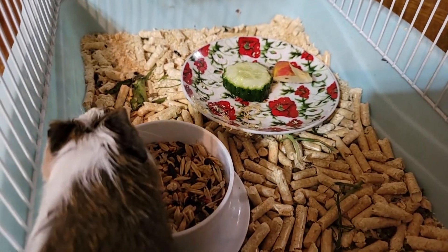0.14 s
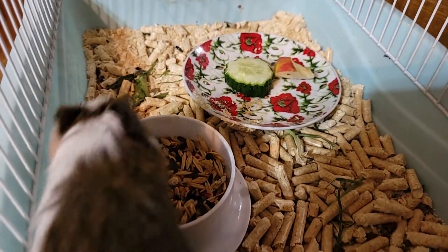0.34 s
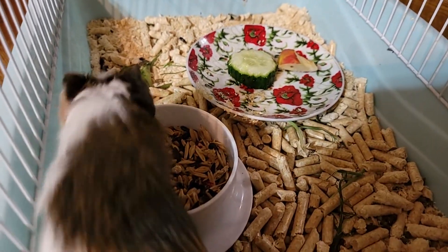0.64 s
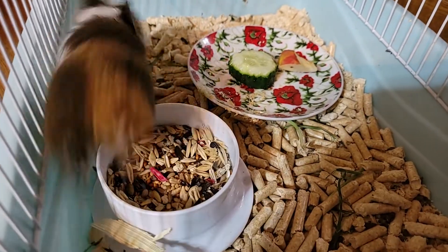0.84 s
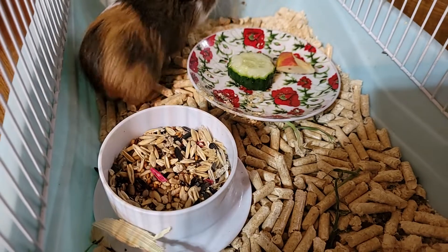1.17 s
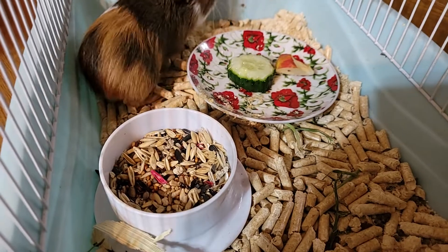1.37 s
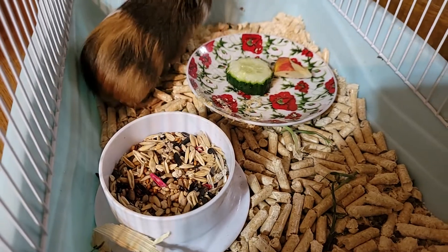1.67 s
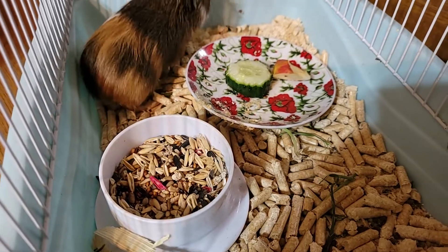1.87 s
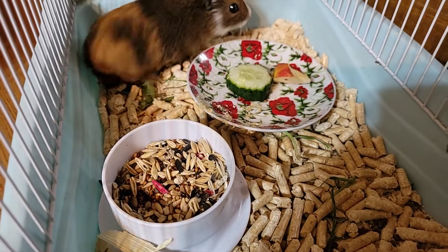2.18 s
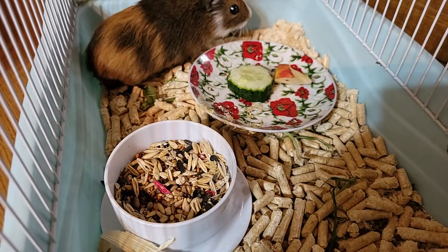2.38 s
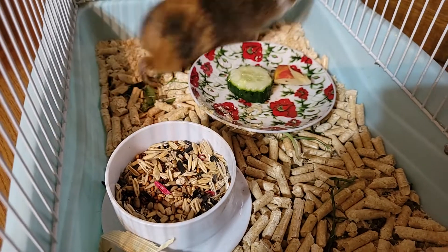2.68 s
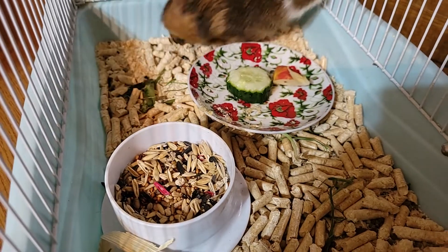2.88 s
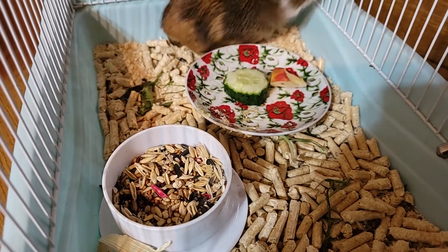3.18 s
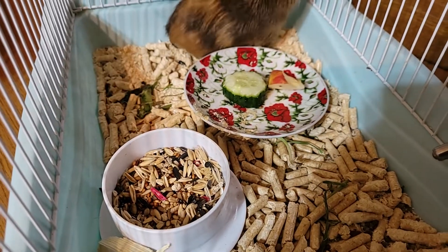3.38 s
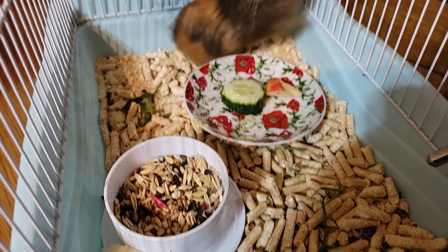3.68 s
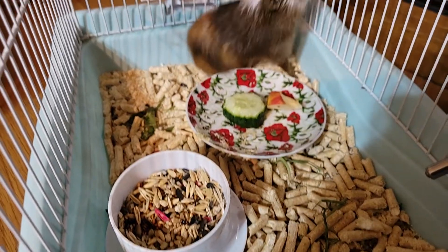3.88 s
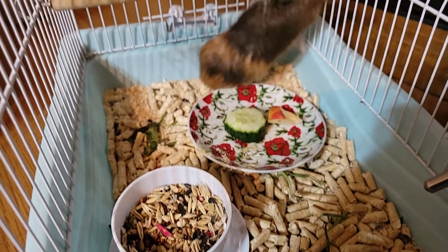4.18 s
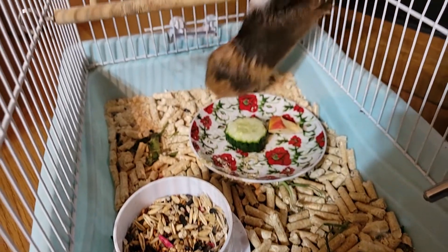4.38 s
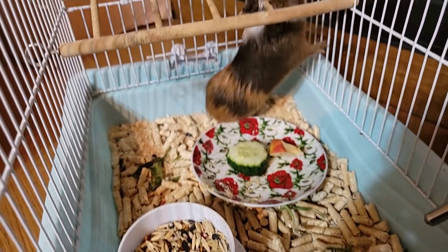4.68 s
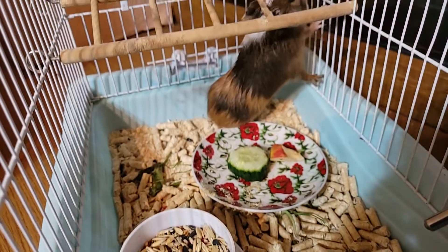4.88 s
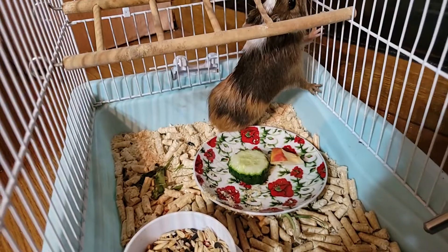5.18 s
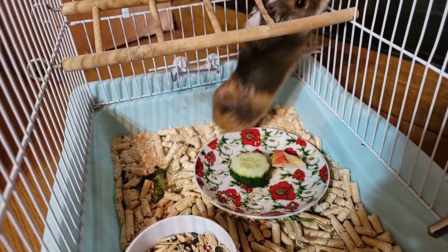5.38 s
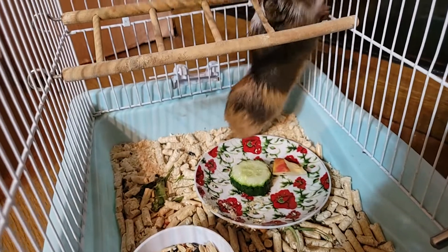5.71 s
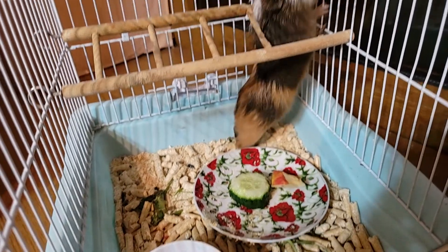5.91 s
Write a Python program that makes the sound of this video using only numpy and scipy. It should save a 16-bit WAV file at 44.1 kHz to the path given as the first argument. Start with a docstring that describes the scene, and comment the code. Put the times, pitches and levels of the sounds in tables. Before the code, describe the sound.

A close stereo microphone hears a guinea pig in a wire cage, in a quiet room with faint hiss and a low wavering hum. At 0.5 s comes a tiny rough cluck and a pellet rustle. At about 0.8 and 0.9 s two sharp, hollow plastic clacks against the food bowl dominate, each with a brief noisy room tail, amid rustling bedding, dry ticks and soft low footfalls until 1.5 s. Short, nearly pure squeaks, each flicking upward, come at 1.0, 1.2, 1.5, 2.1, 2.6, 2.8 and 3.0 s, then fainter and more roomy at 3.3, 3.9, 4.5, 4.9 and 5.5 s. A light knock falls at 2.7 s. Around 4.0 s paws knock in a quick cluster with a thump, rustle and faint wire ping; duller knocks and very faint bar scrapes follow until 4.6 s. A last soft knock comes at 5.5 s and a faint step at 5.7 s.

```python
"""A guinea pig clucks short squeaks, nearly pure tones that flick upward, in a wire cage in a quiet room. As it
hops past the food bowl, two sharp clacks ring plastic modes and each shakes the seeds in the bowl, which rattle
as diffuse noise. Low floor modes thump under its feet and filtered noise rustles as pellet bedding; paws knock
and scrape the cage, whose damped bars rattle and one wire pings. A convolved tail rings faintly over room noise
and a low hum of narrow noise bands."""
import sys
import numpy as np
from scipy import signal
from scipy.io import wavfile

SR = 44100
rng = np.random.default_rng(int(sys.argv[2]) if len(sys.argv) > 2 else 0)


def wav_record(signal):
    """Record a signal, one row per channel, as 16-bit PCM in the file named by sys.argv[1]."""
    frames = np.transpose(np.atleast_2d(signal))
    bounded = np.clip(frames, -1, 1)
    # unit amplitude maps onto the largest positive 16-bit level
    quanta = np.round(bounded * 32767).astype(np.int16)
    wavfile.write(sys.argv[1], SR, quanta)


N = 266805

# Clacks against the food bowl. Each row: start in seconds, level in dB, time to the rebound in seconds.
CLACKS = [(0.7873, -21, 0.0022), (0.9194, -18, .0015)]


def from_db(db):
    """Amplitude ratio: 20 dB is a factor of ten."""
    return 10 ** (np.asarray(db) / 20)


def rms_one(x):
    """Normalization: scale to unit mean power."""
    return x / np.sqrt(np.mean(x ** 2) + 1e-20)


def at_hz(points, hz):
    """Linear interpolation of a table along a log-frequency axis."""
    table_hz, values = np.transpose(points)
    return np.interp(np.log(hz), np.log(table_hz), values)


def seconds(length):
    """Sampling: a time axis of the given length in seconds."""
    return np.arange(int(length * SR)) / SR


def cut(x, hz, kind, order=2):
    """Butterworth filtering: maximally flat in the pass band."""
    sections = signal.butter(order, np.clip(hz, 10, .45 * SR), kind, fs=SR, output="sos")
    return signal.sosfilt(sections, x)


def add(out, s, x, pan_db=0):
    """Superposition: mix in a sound at time s, the left louder than the right by pan_db."""
    i = round(s * SR)
    stereo = x * from_db([[pan_db / 2], [-pan_db / 2]])
    out[:, i:i + x.shape[-1]] += stereo[:, :N - i]


def wobble(size, hz):
    """Low-passed noise: smooth chance fluctuation with spread 1."""
    return rms_one(cut(rng.standard_normal(SR // 2), hz, "low"))[-size:]


def ring(modes, t, scatter_db=0, phase=0):
    """Modal superposition: decaying sines, among which every blow shares its force anew."""
    hz, db, t60 = np.transpose(modes)[:, :, None]
    db = db + scatter_db * rng.standard_normal(hz.shape)
    signs = (-1) ** np.arange(len(hz))[:, None]
    decay = from_db(db - 60 * t / t60)
    return np.sum(signs * decay * np.sin(2 * np.pi * hz * t + phase), axis=0)


def diffuse_bands(size):
    """Diffuse-field coherence: third-octave noise, alike left and right in the bass, hardly in the treble."""
    # Each row: frequency in Hz, left-right correlation.
    likeness = [(50, 0.94), (200, .92), (400, .65), (750, 0.59), (1400, 0), (4000, 0.061), (15000, 0.063)]
    edges = 28 * 2 ** (np.arange(29) / 3)
    white = rng.standard_normal((2, 2, size + SR // 4))
    for k, (low, high) in enumerate(zip(edges, edges[1:])):
        mid, side = cut(white[k % 2], [low, high], "band", order=3)[:, -size:]
        hz = np.sqrt(low * high)
        alike = np.clip(at_hz(likeness, hz), -1, 1)
        yield hz, np.sqrt(1 + alike) * mid + np.sqrt(1 - alike) * side * [[1], [-1]]


def coloured(spectrum, flicker_db):
    """Spectral shaping: diffuse noise of a given colour whose bands waver; rms 1."""
    knots = np.linspace(0, N, 90)
    total = np.zeros((2, N))
    for hz, band in diffuse_bands(N):
        waver = from_db(flicker_db * rng.standard_normal(len(knots)))
        total += from_db(at_hz(spectrum, hz)) * band * np.interp(np.arange(N), knots, waver)
    return rms_one(total)


def strokes(rows, grain_db, slip_hz=260):
    """Stick-slip envelope: rubbing rises quickly and falls more slowly, broken into slips."""
    level = np.zeros((2, N))
    for s, length, db in rows:
        t = seconds(length)
        swell = np.sin(np.pi * (t / length) ** .5) ** 0.59
        add(level, s, from_db(db + grain_db * wobble(len(t), slip_hz)) * swell)
    return level


def place_db(s):
    """Intensity panning: left-right position of the animal at time s."""
    # Each row: time in seconds, left over right in dB.
    path = [(.5, -1.9), (1.2, .4), (3.9, .5), (4.5, -1.8), (5.6, -3)]
    return np.interp(s, *np.transpose(path))


def squeaks(turn=.68, attack_s=0.0055, release_s=0.0025, swell_db=3.5, fade_from=.76, fade_db=-15,
            arch_db=-5.0, jitter=.055, shimmer=0.55, second_ratio=1.3, second_climb=0.81,
            rasp_db=-13, rasp_low_hz=900, rasp_top_hz=2600):
    """Harmonic voicing: a nearly pure tone glides, then flicks upward as the voice lets go, with
    turbulent rasp gated by each cycle. Returns tone and rasp."""
    # Calls. Each row: start in seconds, length in seconds, base pitch in Hz, opening offset
    # as a share of the pitch (negative opens below it), level in dB, roughness from 0 to 1.
    calls = [ (0.471, 0.035, 652.5, .4, -46, 0.64), (0.97, 0.057, 802, .24, -32.5, 0.31),
             (1.057, 0.022, 830, 0.13, -44, 0.82), (1.171, 0.07, 738, -0.0031, -33.5, 0.13),
             (1.544, 0.067, 728.5, -0.043, -37.5, 0.17), (2.112, 0.052, 723, 0.11, -33.5, 0.1),
             (2.57, 0.037, 749, -0.12, -41, 0.1), (2.76, 0.052, 730.7, 0.029, -38, 0.27),
             (2.967, 0.061, 714.3, 0.0017, -42.5, 0.21), (3.316, .054, 732, .03, -44, 0.2),
             (3.878, 0.05, 766, .36, -45.5, 0.39), (4.462, 0.037, 765, 0.017, -50, .12),
             (4.916, .043, 737.3, 0.16, -45.5, 0.24), (5.54, 0.036, 773, 0.066, -45, 0.34)]
    # Throat colour. Each row: frequency in Hz, level in dB.
    throat = [(2300, 2), (3000, -8), (3700, -13), (4400, -26), (6000, -40)]
    # As the animal turns, its octave reaches the two sides out of step.
    # Each row: time in seconds, phase gap at the octave in radians.
    facing = [(1.0, 2.7), (1.15, .1), (2.57, .5), (2.75, 3), (3.32, 2.6), (4.46, .5)]
    fundamental_gap, overtone_gap = .3, 2.0  # radians between left and right
    full_effort_db = -34  # level of a full-effort call
    flick_share, flick_follows = 0.37, 0.41  # full-effort rise as a share of pitch; softer calls rise less
    octave_db, octave_fade_db = -13, -8.5  # against the fundamental; it dies first in the release
    overtone_base_db = -41.5  # a clean, full-effort call
    rough_gain, soft_gain = 32, .3  # overtone dB per unit of roughness, and per dB below full effort
    second_base_db, second_sag_db = -16, -75.5  # the second tone weakens the higher a call opens
    ears = np.array([[.5], [-.5]])
    tones, rasps = np.zeros((2, 2, N))
    for s, length, hz, opening, db, rough in calls:
        t = seconds(length)
        u = t / length
        push_db = db - full_effort_db
        sag = np.clip(1 - u / turn, 0, 1)
        flick = np.clip((u - turn) / (1 - turn), 0, 1)
        rise = flick_share * from_db(flick_follows * push_db)
        pitch = hz * (1 + opening * sag ** 1.5 + rise * flick ** 1.5)
        pitch = pitch * (1 + jitter * rough * wobble(len(t), 230))
        phase = 2 * np.pi * np.cumsum(pitch) / SR

        release = np.clip((u - fade_from) / (1 - fade_from), 0, 1)
        effort = from_db(swell_db * (u - 1.0) + arch_db * (2 * u - 1) ** 2 + fade_db * release)
        effort = effort * np.clip(t / attack_s, 0, 1) * np.clip((length - t) / release_s, 0, 1)

        fundamental = np.cos(phase + fundamental_gap * ears)
        octave = np.cos(2 * phase + np.interp(s, *np.transpose(facing)) * ears)
        overtones = np.zeros((2, len(t)))
        for k in range(3, 8):
            partial = np.cos(k * phase + overtone_gap * ears)
            overtones += from_db(at_hz(throat, k * hz)) * partial * (1 + shimmer * wobble(len(t), 130))
        overtone_db = overtone_base_db + rough_gain * rough - soft_gain * push_db
        # before the flick a second, inharmonic tone climbs towards the octave
        second_phase = 2 * np.pi * np.cumsum(pitch * (second_ratio + second_climb * u)) / SR
        second = np.cos(second_phase) * np.sin(np.pi * sag)

        tone = fundamental + from_db(octave_db + octave_fade_db * release) * octave
        tone = tone + from_db(overtone_db) * overtones
        tone = tone + from_db(second_base_db + second_sag_db * opening) * second
        tone = tone * (1 + shimmer * rough * wobble(len(t), 250))

        turbulence = rng.standard_normal((2, len(t))) * (1 + np.cos(phase))
        rasp = rms_one(cut(turbulence, [rasp_low_hz, rasp_top_hz], "band", order=4))
        level = np.sqrt(2) * from_db(db) * effort
        add(tones, s, level * tone, place_db(s))
        add(rasps, s, level * from_db(rasp_db) * rough ** 1.5 * rasp, place_db(s))
    return tones, rasps


def blow(bright_hz, crack_db, crack_t60=0.014, crack_low_hz=1900, ring_db=-5, spread=2.0, spread_hz=1100):
    """Impact excitation: a noisy crack and ringing plastic, low-passed lower when the contact is soft."""
    # Modes of bowl and tray. Each row: frequency in Hz, level in dB, t60 in seconds.
    plastic = [(299.9, -27, 0.081), (569, -7.5, .045), (723, -4.5, .03), (1051.4, -1, .03),
               (1202.6, -3.5, 0.027), (1510, -7, .02), (2120, -0.5, 0.013), (2620, -4, 0.0063),
               (2907, -6.5, .012), (3397, -8, 0.025), (4700, -3.5, 0.0088), (5634, -12, .007),
               (6600, -8.5, .007), (8150, -8.5, 0.0032)]
    t = seconds(.1)
    # the higher modes radiate in lobes and reach the two ears out of step
    lobes = np.clip(np.array(plastic)[:, :1] / spread_hz, 0, 1) ** 3
    skew = spread * lobes * rng.uniform(-1.3, 1, (len(plastic), 1))
    left = ring(plastic, t, scatter_db=1.0, phase=skew)
    right = ring(plastic, t, scatter_db=0.5, phase=-skew)
    burst = rng.standard_normal((2, len(t))) * from_db(-60 * t / crack_t60)
    crack = cut(burst, crack_low_hz, "high")
    body = np.array([left, right])
    return cut(from_db(ring_db) * body + from_db(crack_db) * crack, bright_hz, "low", order=5)


def clacks(graze_s=.006, graze_db=-13, rebound_db=-1.0, strike_pan_db=6.0, rebound_pan_db=-1.5):
    """Repeated impact: the bowl is grazed, strikes sharply and rebounds with a duller knock."""
    out = np.zeros((2, N))
    for s, db, rebound_s in CLACKS:
        graze = blow(bright_hz=1095.2, crack_db=-11)
        strike = blow(bright_hz=12800, crack_db=-0.5, crack_t60=.009)
        rebound = blow(bright_hz=2800, crack_db=8, crack_low_hz=1320)
        add(out, s - graze_s, from_db(db + graze_db) * graze)
        add(out, s, from_db(db) * strike, strike_pan_db)
        add(out, s + rebound_s, from_db(db + rebound_db) * rebound, rebound_pan_db)
    return out


def clack_tail(level_db=-52, t60=0.62, grain_db=3.5, grain_hz=300, rise_s=0.002, pan_db=1.0):
    """Granular rattle: each clack shakes the seeds in the bowl, which rattle as diffuse noise that decays
    exponentially."""
    # Colour of the rattle. Each row: frequency in Hz, density in dB per Hz.
    noise_colour = [(600, -27), (1100, -3), (1600, 0), (2600, -2.5), (4000, -6), (6500, -9), (10000, -13.5),
                    (15000, -19)]
    level, t = np.zeros((2, N)), seconds(.45)
    for s, _, _ in CLACKS:
        decay = from_db(level_db - 60 * t / t60 + grain_db * wobble(len(t), grain_hz))
        add(level, s, decay * np.clip(t / rise_s, 0, 1), pan_db)
    return level * coloured(noise_colour, flicker_db=1.5)


def knocks(crack_from_hz=1560, soft_crack_db=-13, crack_db_per_octave=22, settle_s=.012, settle_db=-10):
    """Contact stiffness: paws knock tray and frame, harder contacts crack more, then a weaker touch settles."""
    # Each row: start in seconds, level in dB, contact brightness (low-pass corner) in Hz.
    contacts = [(.877, -35, 1510), (1.008, -34.5, 2700), (1.0656, -39.5, 2460), (2.727, -40.5, 1800),
                (3.7842, -46.5, 1595), (3.867, -46, 1304), (3.9908, -33.5, 1420), (4.0026, -34.5, 3120),
                (4.021, -45.5, 3000), (4.0453, -35.5, 3310), (4.209, -43.5, 2080), (4.237, -39.5, 2100),
                (4.317, -39, 708), (4.421, -34, 754), (4.541, -41.5, 802), (5.517, -37, 895)]
    out = np.zeros((2, N))
    for s, db, bright_hz in contacts:
        octaves = max(np.log2(bright_hz / crack_from_hz), 0)
        knock = blow(bright_hz, soft_crack_db + crack_db_per_octave * octaves)
        add(out, s, from_db(db) * knock, place_db(s))
        settle = blow(bright_hz, soft_crack_db)
        settle_at = s + settle_s * rng.uniform(.7, 1.3)
        add(out, settle_at, from_db(db + settle_db) * settle, place_db(s))
    return out


def footfalls(soft_hz=260, low_hz=50, hind_s=0.043, hind_db=-8.5):
    """Plate resonance: soft paws drum the thin tray floor, front pair then the weaker hind pair."""
    # Hops. Each row: start in seconds, level in dB.
    hops = [(0.919, -43), (.957, -33.5), (1.157, -40.5), (1.299, -50.5), (1.426, -48), (1.546, -54.5),
            (3.988, -41), (5.729, -51)]
    # Modes of the floor. Each row: frequency in Hz, level in dB, t60 in seconds.
    floor = [(58, -19, .12), (86, -7.5, .12), (113, -5.5, .07), (152, -0.5, .11), (225, -7.5, .06),
             (305.9, -8, 0.24)]
    out, t = np.zeros((2, N)), seconds(.3)
    for s, db in hops:
        for delay_s, paw_db in ((0, 0), (hind_s, hind_db)):
            thump = cut(ring(floor, t, scatter_db=4.0), [low_hz, soft_hz], "band")
            add(out, s + delay_s, from_db(db + paw_db) * thump, pan_db=-2)
    return out


def bedding():
    """Granular friction: feet shove the pellets, which rustle as coloured noise under stroke envelopes."""
    # Shoves. Each row: start in seconds, length in seconds, level in dB.
    shoves = [(0.462, 0.075, -57), (0.768, 0.19, -52), (0.92, 0.31, -60.5), (3.78, 0.061, -64.5),
              (3.98, 0.053, -50.5), (4.2, 0.12, -58.5), (4.39, 0.14, -65), (5.72, 0.053, -66.5)]
    # Colour of the rustle. Each row: frequency in Hz, density in dB per Hz.
    rustle = [(200, -8), (500, 2), (1000, 2.5), (1600, -2.5), (2300, -14), (4000, -24.5), (8000, -26),
              (15000, -27)]
    return strokes(shoves, grain_db=3.5) * coloured(rustle, flicker_db=6.0)


def ticks(t60=0.0056, low_hz=6500, pan_db=3):
    """Impulsive noise: pellets and claws snap drily in decaying, high-passed bursts."""
    # Each row: start in seconds, level in dB.
    snaps = [(0.8628, -36.5), (0.8952, -40), (1.0938, -45.5), (2.2375, -61), (3.7845, -53.5), (4.238, -59),
             (5.7602, -57)]
    out, t = np.zeros((2, N)), seconds(.03)
    for s, db in snaps:
        burst = rng.standard_normal((2, len(t))) * from_db(-60 * t / t60)
        add(out, s, from_db(db) * cut(burst, low_hz, "high"), pan_db)
    return out


def bars(ping_s=3.9625, ping_db=-59):
    """Forced and free vibration: sliding paws excite the damped bars; a claw plucks one wire, which rings."""
    # Slides. Each row: start in seconds, length in seconds, level in dB.
    slides = [(4.07, 0.068, -77.5), (4.235, 0.033, -63), (4.35, 0.097, -72.5), (4.52, 0.066, -75.5),
              (4.815, 0.1, -80), (5.005, .04, -80.5), (5.42, 0.13, -81), (5.72, 0.023, -81)]
    # Damped bar modes. Each row: frequency in Hz, level in dB, t60 in seconds.
    bar_modes = [(1735, 7, 0.039), (3380, -5.5, 0.02), (5180, -1.5, 0.01), (5900, -3.5, 0.015),
                 (8160, 4, 0.0088), (10950, -3, 0.0082), (13800, -5, .006)]
    # Free wire modes. Each row: frequency in Hz, level in dB, t60 in seconds.
    wire_modes = [(2250, -8.5, 0.5), (4640, -4, 0.2), (7000, -1.5, 0.12), (8250, -9, .03),
                  (9500, -3.5, 0.085), (12300, -1, 0.034), (15310, -12, .06)]
    response = ring(bar_modes, seconds(.05))[None]
    friction = signal.fftconvolve(rng.standard_normal((2, N)), response, axes=1)[:, :N]
    out = rms_one(friction) * strokes(slides, grain_db=4.0)
    add(out, ping_s, from_db(ping_db) * ring(wire_modes, seconds(.2)))
    return out


def room(x, delay_s=0.002, build_s=0.012):
    """Reverberation: convolution with a diffuse tail whose decay time depends on frequency."""
    # Each row: frequency in Hz, t60 in seconds.
    decay_times = [(100, 0.38), (700, 0.9), (2000, 0.3), (6000, 0.43), (14000, 0.1)]
    # Each row: frequency in Hz, level in dB.
    tail_colour = [(100, 3), (750, 1), (1150, 2), (1900, 6), (4000, 0.5), (8000, -2), (15000, -5.5)]
    t = seconds(0.95)
    tail = np.zeros((2, len(t)))
    for hz, band in diffuse_bands(len(t)):
        tail += band * from_db(at_hz(tail_colour, hz) - 60 * t / at_hz(decay_times, hz))
    tail = tail * np.clip((t - delay_s) / build_s, 0, 1)
    return signal.fftconvolve(x, rms_one(tail) / np.sqrt(len(t)), axes=1)[:, :N]


def air(level_db=-69.5):
    """Stationary broadband noise: the room's quiet noise and hiss."""
    # Each row: frequency in Hz, density in dB per Hz.
    noise_colour = [(28, -22.5), (55, -4.5), (110, -3), (290, 0.5), (430, -9), (620, -0.5), (850, -7),
                    (1150, -15), (1800, -22), (3200, -31), (7000, -33), (15000, -30)]
    return from_db(level_db) * coloured(noise_colour, flicker_db=2.0)


def hum():
    """Narrow-band noise: each narrow band is heard as a wavering background tone."""
    # Each row: centre in Hz, width in Hz, level in dB.
    tone_bands = [(118.4, 10, -79.5), (174, 17, -82.5), (299.5, 15, -79), (358, 40, -76), (526.3, 27, -77),
                  (727.7, 18, -75.5), (917, 48, -79), (2814, 110, -99.5)]
    out = np.zeros((2, N))
    for hz, width_hz, db in tone_bands:
        edges = [hz - width_hz / 2, hz + width_hz / 2]
        mid, side = cut(rng.standard_normal((2, N + SR)), edges, "band")[:, SR:]
        out += from_db(db) * rms_one(mid + 0.62 * side * np.array([[1], [-1]]))
    return out


def scene(tone_wet_db=-24, rasp_wet_db=-11, clack_wet_db=-21, cage_wet_db=-15, floor_wet_db=-14, far_wet_db=6):
    """Direct-to-reverberant ratio: the voice grows wetter as the animal moves to the far corner."""
    tone, rasp = squeaks()
    feet, bowl = footfalls(), clacks()
    cage = knocks() + ticks() + bars() + bedding()
    distance = np.interp(np.arange(N) / SR, [2.5, 4.5], [0, 1])
    voice_send = from_db(tone_wet_db) * tone + from_db(rasp_wet_db) * rasp
    send = from_db(far_wet_db * distance) * voice_send + from_db(clack_wet_db) * bowl
    send = send + from_db(cage_wet_db) * cage + from_db(floor_wet_db) * feet
    return tone + rasp + bowl + clack_tail() + feet + cage + room(send) + air() + hum()


def record(dry, cutoff_hz=15850):
    """Elliptic low-pass filtering: the top of the spectrum is cut steeply."""
    return signal.sosfilt(signal.ellip(10, .2, 70, cutoff_hz, fs=SR, output="sos"), dry)


dry = scene()
out = record(dry)
wav_record(out)
```